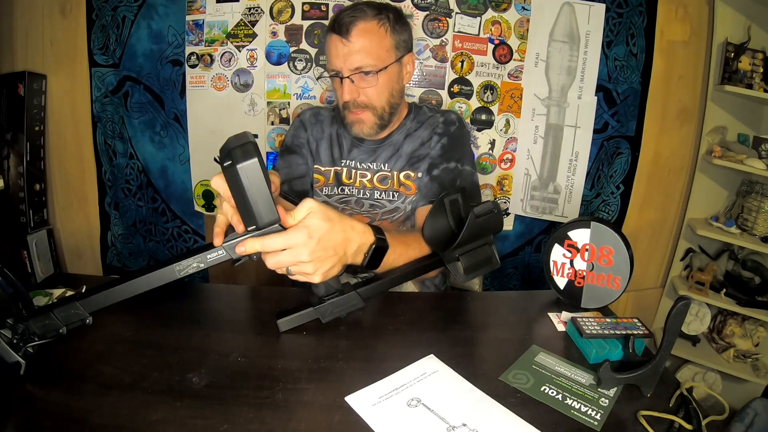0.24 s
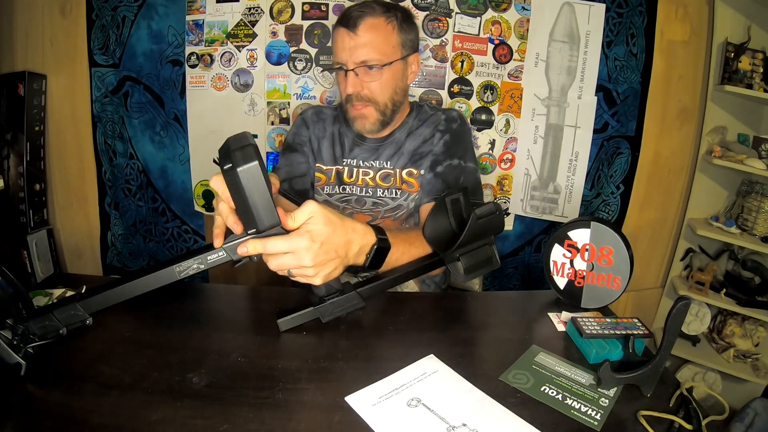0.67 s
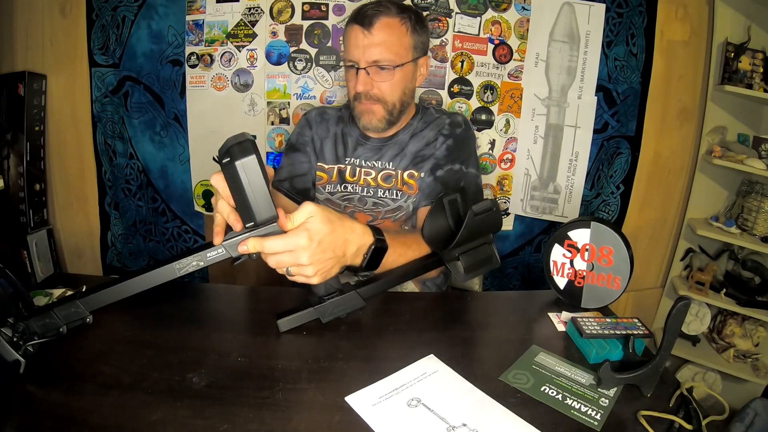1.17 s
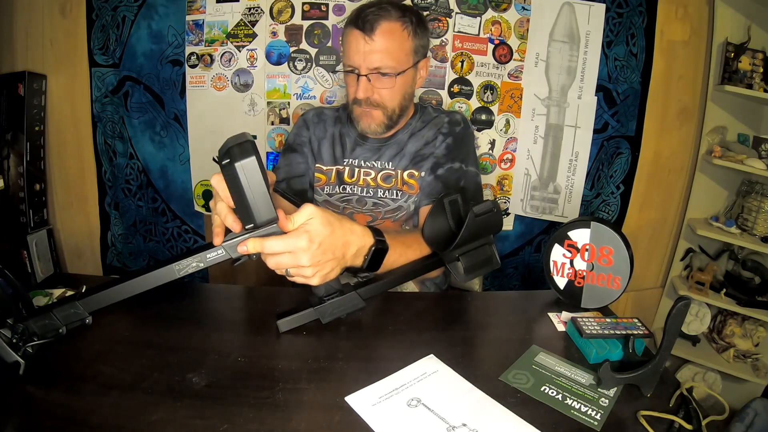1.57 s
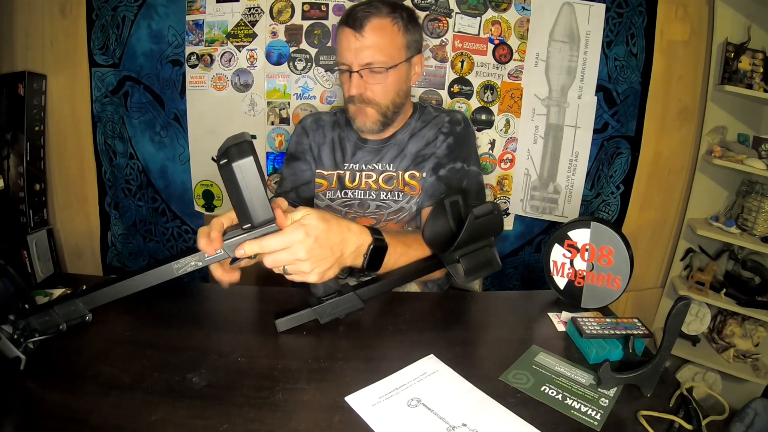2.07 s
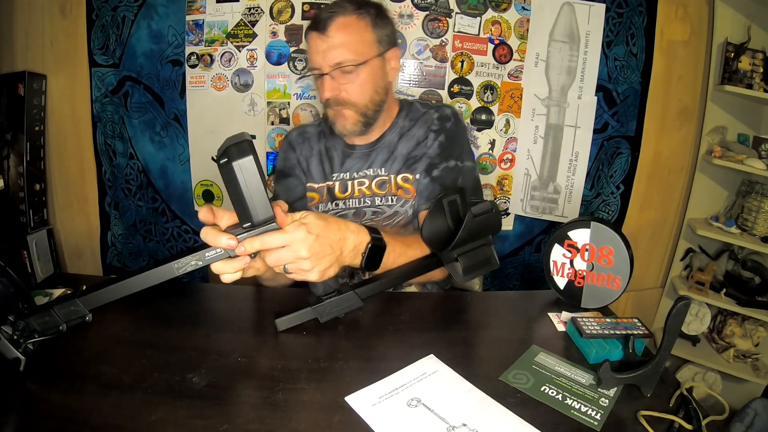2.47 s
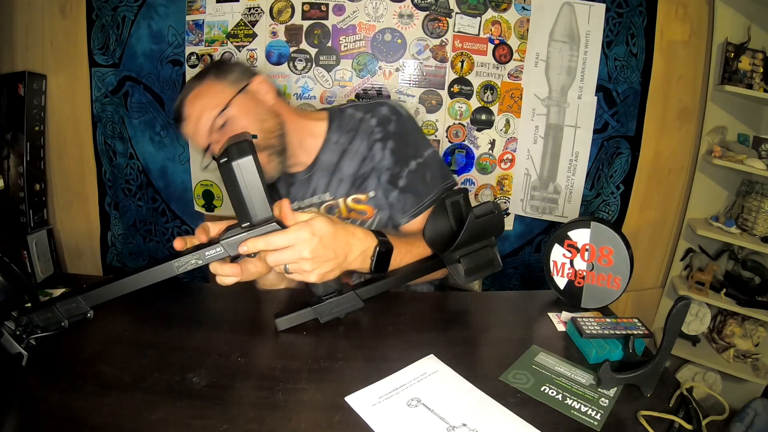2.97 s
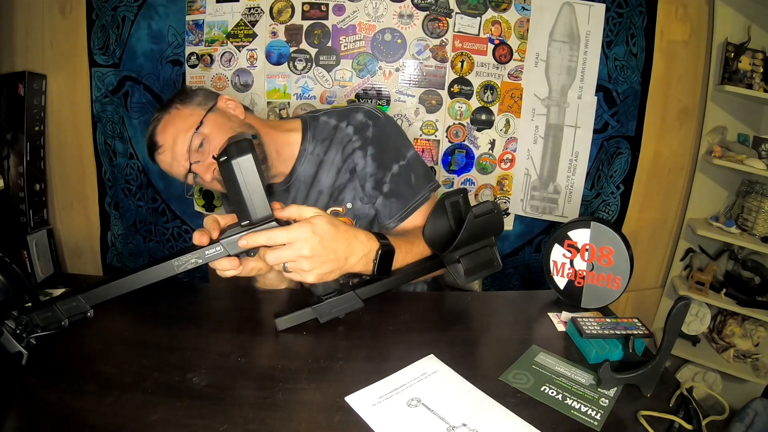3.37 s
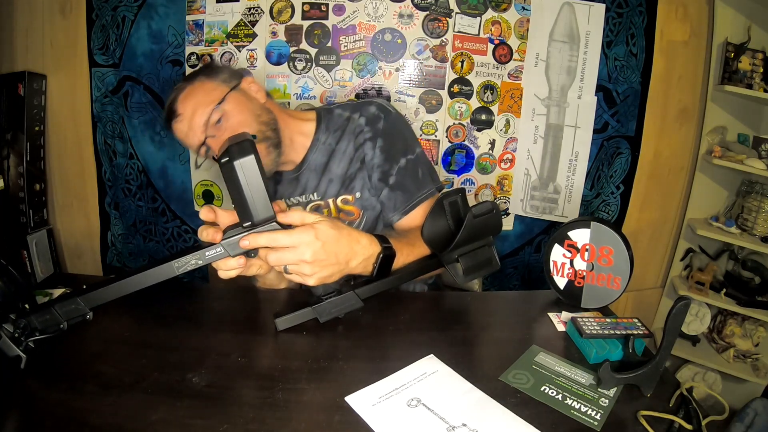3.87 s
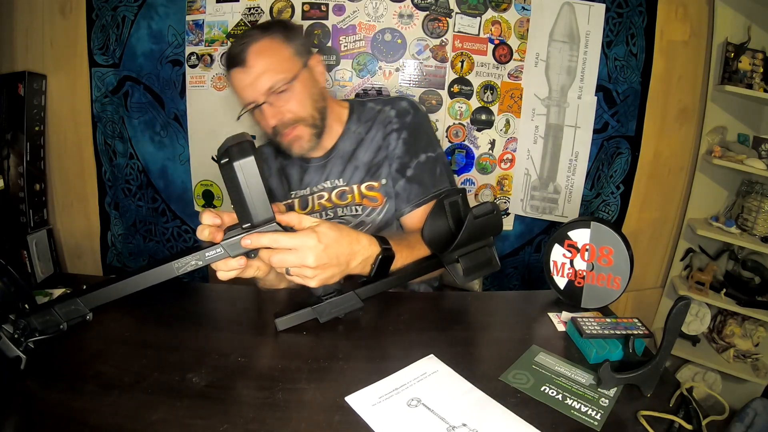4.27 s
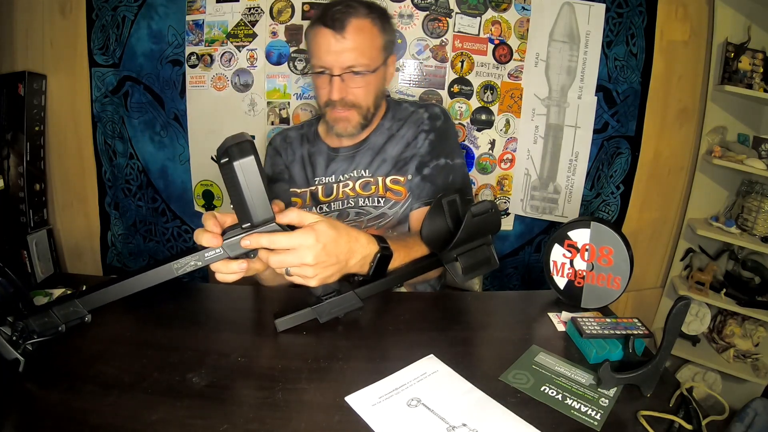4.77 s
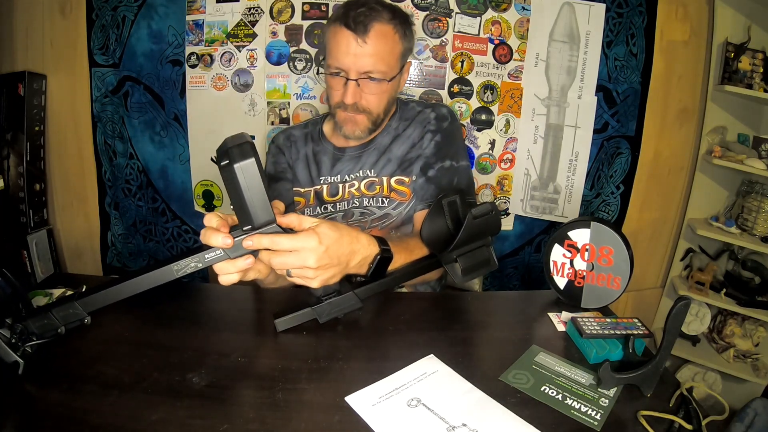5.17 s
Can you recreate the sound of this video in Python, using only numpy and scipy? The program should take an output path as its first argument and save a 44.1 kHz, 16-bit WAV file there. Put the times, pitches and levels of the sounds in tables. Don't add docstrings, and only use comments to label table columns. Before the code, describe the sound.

Hands fit a hard plastic housing onto a hollow shaft at a wooden desk. Small rattles and soft thumps lead to a sharp catch snap, then clacks, a gritty ratcheting slide, sparse dry ticks and faint scuffs. A heavy knock lands late, followed by a few light clacks. Small quiet room with brief wall reflections, stereo microphone standing on the desk, picking up low bumps through the wood.

```python
import sys
import numpy as np
from scipy import signal
from scipy.fft import rfft, irfft
from scipy.io import wavfile
from scipy.ndimage import uniform_filter1d

SR = 44100
rng = np.random.default_rng(int(sys.argv[2]) if len(sys.argv) > 2 else 0)


def volts_from_decibels(level):
    exponent = np.asarray(level, float) / 20
    return 10 ** exponent


def persist_wave(psi):
    counts = np.round(np.clip(psi, -1, 1) * 32767).astype(np.int16)
    wavfile.write(sys.argv[1], SR, np.atleast_2d(counts).T)


N = 239771

# (pitch_hz, still_air, wall_echoes, sliding_hands)
LIKENESS = [(60, 0.37, 1, .9), (249, -0.032, 0.89, .9), (397, -1.2, 0.81, 0.55), (700, -0.64, 0.23, 0.19),
            (1150, -0.71, 0.14, 0.21), (1800, -0.3, 0.51, 0.24), (2680, 0.2, 0.52, 0.94),
            (4200, 0.45, 0.57, 0.84), (5370, 0.27, 0.15, .4), (9000, 0.15, 0.02, 0.37)]


def evened(x):
    return x / np.sqrt(np.mean(x ** 2) + 1e-20)


def peaked(x):
    return x / (abs(x).max() + 1e-12)


def read(points, hz, axis=1):
    table = np.transpose(points)
    return np.interp(np.log(hz + 1), np.log(table[0] + 1), table[axis])


def add(mix, s, sound):
    part = mix[round(s * SR):][:len(sound)]
    part += sound[:len(part)]


def band(x, lo_hz, hi_hz):
    return signal.sosfilt(signal.butter(4, [lo_hz, hi_hz], "band", fs=SR, output="sos"), x)


def ring(x, modes, stretch=1):
    total = 0
    for k, (hz, width, db) in enumerate(modes):
        b, a = signal.iirpeak(hz * stretch, max(hz / width, .3), SR)
        total = total + (-1) ** k * volts_from_decibels(db) * signal.lfilter(b, a, x)
    return total


def swells(s, db, fade_s, rise_s, rest_db):
    late = np.arange(0, N + 64, 64) / SR - s[:, None]
    shape = db[:, None] - 20 * np.maximum(late / np.maximum(fade_s, .02)[:, None], -late / rise_s)
    level_db = 10 * np.log10((volts_from_decibels(shape) ** 2).sum(0) + volts_from_decibels(rest_db) ** 2)
    return np.interp(np.arange(N) / 64, np.arange(len(level_db)), level_db)


def noise(spectrum_db, patchy_db, size, close=0):
    hop, hz = size // 4, np.fft.rfftfreq(size, 1 / SR)
    frames = N // hop + 5
    starts = np.arange(frames) * hop
    a, b, c, d, patches = rng.standard_normal((frames, len(hz), 5)).T
    patches = uniform_filter1d(patches, size=6, axis=0)
    patches = evened(uniform_filter1d(patches, size=12, axis=1))
    close = np.interp(starts, np.arange(N), close * np.ones(N))
    same = np.outer(read(LIKENESS, hz), 1 - close) + np.outer(read(LIKENESS, hz, axis=3), close)
    same = np.clip(same, -1, 1)
    first = a + 1j * b
    second = same * first + np.sqrt(1 - same ** 2) * (c + 1j * d)
    z = np.array([first, second]) * volts_from_decibels(spectrum_db(hz[:, None], starts / SR) + patchy_db * patches)
    return signal.istft(z, nperseg=size, noverlap=size - hop)[1][:, :N]


def ticks():
    # (start_s, peak_db, shell_ring_hz, shaft_hollow_db)
    clacks = [(0.1667, -44.5, 1840, -7.5), (0.825, -52.5, 2250, -9), (0.9958, -56, 1860, -18),
              (1.104, -44.5, 2500, -7.5), (1.1117, -46.5, 2020, -2.5), (1.1546, -42, 2210, -3),
              (2.8587, -42.5, 2410, -8), (3.9809, -52.5, 2940, -6), (3.9957, -39, 2630, -9.5),
              (4.7069, -59, 1910, 1), (4.7328, -46.5, 2170, -13.5), (4.8466, -40, 2720, -12.5)]
    rattles = [(0.1042, -50, 2300, -3), (0.3363, -47.5, 2200, 5), (0.9013, -55, 2300, -13),
               (0.9199, -49, 2320, -9.5), (1.0847, -59.5, 3050, -16), (1.724, -44, 2570, -10.5),
               (2.37, -51, 2800, -38), (3.7491, -51.5, 2370, -4), (4.9093, -53.5, 2510, -27.5)]
    taps = [(0.0727, -66, 2030, -18), (0.3037, -57.5, 2830, -0.5), (0.3453, -49.5, 2530, 8),
            (0.4828, -59, 2440, -3), (1.6307, -66, 2160, 8.5), (1.6975, -62, 2620, 3),
            (3.684, -52.5, 2090, -2), (4.693, -53, 3070, 0.5), (5.03, -65.5, 1800, -2),
            (5.2044, -81, 1815, 24), (5.3228, -66, 2440, 10.5)]
    nicks = [(0.2421, -58.5, 2630, -3), (0.6798, -53, 2530, 1.5), (3.4458, -58.5, 3190, -3),
             (4.8302, -56.5, 2570, -3), (4.9659, -66.5, 1693, 21), (5.1027, -58.5, 2960, -11)]
    swipes = [(1.3205, -59.5, 2090, 5.5), (3.045, -50, 2960, -13), (3.5054, -61.5, 2800, -3),
              (3.581, -60.5, 3100, 1), (3.7948, -58.5, 3060, -4)]
    pips = [(2.519, -49.5, 2260, -3.5), (2.6324, -43, 2080, -8), (2.6639, -37.5, 2220, -13.5),
            (2.741, -48, 2330, -26)]
    snaps = [
        (0.5293, -27.5, 2680, -17),
        (0.5467, -19.5, 2510, -14),
    ]
    latch = [(0.7141, -27, 2440, -14.5)]
    seating = [
        (4.215, -30, 2490, -1.5),
        (4.2173, -30.5, 2320, 12.5),
    ]
    # (rows, bright_edge_db, contact_ms, top_hz, share_to_walls_db)
    kinds = [(clacks, -1, 1.54, 11300, -0.09), (rattles, -1.8, 3.64, 9000, -.1), (taps, -17, 3.45, 9100, -.1),
             (nicks, 5.8, 2.03, 8600, -.1), (swipes, 6, 10.3, 10900, -.1), (pips, -0.5, 1, 9700, 0),
             (snaps, -1.7, 1.7, 12200, -.1), (latch, -2.4, 2.65, 6000, -2.5), (seating, -7, 3, 9800, -1)]
    # (pitch_hz, width_hz, level_db)
    edge_modes = [(3960, 780, -7), (6490, 720, -12), (9450, 740, -18.5), (15000, 900, -24.5)]
    # (pitch_hz, width_hz, level_db)
    hollow_modes = [(547, 360, 0), (1004, 453, 3), (1202, 642, -3.5)]
    out, t = np.zeros((3, N)), np.arange(2000) / SR
    hits = sorted((*row, *kind) for rows, *kind in kinds for row in rows)
    grits = rng.standard_normal((len(hits), 3, len(t)))
    for (s, db, hz, hollow_db, edge_db, ms, top_hz, wall_db), grit in zip(hits, grits):
        u = 1000 * t / max(ms, .2)
        contact = (grit[0] + [[.12], [.5], [.5]] * grit) * np.sqrt(u) * np.exp(-u) * .5
        contact[:, 0] += 3.77 * np.exp(-ms / 2.85)
        contact[2] = (t == 0) * np.linalg.norm(contact[0]) * volts_from_decibels(wall_db)
        stretch = 1 + .08 * np.tanh(grit[0, -1])
        shell = ring(contact, [(hz, 420, 0), (hz * 1.424, 1100, -7), (hz * 0.69, 900, -8), (hz * 2.07, 1600, -10)])
        shell[2] -= 0.48 * ring(contact[2], [(hz, 450, 0)])
        thinned = signal.lfilter([1, -min(ms / 11, 1)], 1, contact)
        edges = ring(thinned, edge_modes, stretch)
        hollow = ring(contact, hollow_modes, stretch)
        parts = (0, shell), (edge_db, edges), (hollow_db, hollow)
        sound = sum(volts_from_decibels(db + g) * part / abs(part[0]).max() for g, part in parts)
        for row, wave in zip(out, band(sound, 180, min(top_hz, 18000))):
            add(row, s, wave)
    return signal.sosfilt(signal.butter(2, 380, "high", fs=SR, output="sos"), out)


def slips():
    # (start_s, peak_db, shell_ring_hz)
    jumps = [(0.7145, -29.5, 2680), (0.7198, -34.5, 2950), (1.1326, -45, 2020), (1.1478, -40.5, 1950),
             (1.167, -48, 3330), (1.177, -48.5, 2180), (1.79, -46.5, 2800), (1.814, -51, 2450),
             (2.0738, -57, 2050), (2.0835, -50.5, 1940), (2.128, -47, 2000), (2.145, -46, 2020),
             (2.157, -44, 2130), (2.1665, -44, 2300), (2.176, -43, 1940), (2.1874, -43, 2100),
             (2.2024, -41, 2050), (2.227, -39.5, 2080), (2.2582, -38.5, 2050), (2.2755, -51, 4400),
             (2.2851, -41.5, 1980), (2.3155, -61, 4400), (2.342, -50, 1910), (2.4121, -49.5, 2160),
             (2.5193, -46, 2120), (2.5653, -44, 2110), (2.633, -43.5, 2085), (2.665, -39, 2180),
             (2.741, -56, 2190), (2.8087, -53, 2090), (2.817, -51, 2330), (2.831, -47.5, 3000),
             (2.929, -47.5, 2530), (2.9851, -49, 2420), (3.0044, -57, 2290), (4.9663, -54, 827),
             (4.965, -61, 4900)]
    out, spike = np.zeros((2, N)), np.eye(1, 600)[0]
    for s, db, hz in jumps:
        ping = ring(spike, [(hz, 240, 0), (hz * 1.213, 400, -4), (hz * 1.62, 700, -12), (6500, 900, -16)])
        ping = volts_from_decibels(db) * peaked(ring(ping, [(hz * 1.0, 3000, 0)]))
        spread = ring(spike, [(hz * 0.73, 1900, 7.0), (5200, 2500, -3.0)])
        add(out[0], s, ping)
        add(out[1], s, np.linalg.norm(ping) * spread)
    return out


def knock():
    # (peak_s, level_db)
    blows = [(4.2066, -35), (4.213, -32), (4.2148, -43), (4.218, -16), (4.2205, -16), (4.2236, -6),
             (4.2279, -10), (4.231, -22.5), (4.2368, -15.5), (4.247, -13.5)]
    # (pitch_hz, level_db, t60_s)
    desk_rings = [(57.6, -16.5, 0.28), (98.8, -11, 0.26), (167, -3, 0.14), (192, 2, 0.21),
                  (263, -6.5, 0.21), (285, -15.5, 0.11), (314, -16, .1), (336, -13, 0.24), (369, -14, 0.19),
                  (394, -10.5, 0.27), (438.5, -12, 0.22), (482, -22, 0.082)]
    # (pitch_hz, level_db, t60_s)
    shaft_rings = [(537, -17.5, 0.13), (584, -18, 0.28), (660, -15.5, 0.2), (692, -11, 0.12),
                   (740, -11, 0.088), (823, -13.5, 0.2), (874, -12, 0.2), (990, -19.5, 0.11),
                   (1086, -18.5, 0.11), (1206, -28.5, 0.14)]
    desk_struck_s, shaft_struck_s = 4.2245, 4.2175
    legs_hz = 180
    t, push, body = np.arange(SR // 2) / SR, np.zeros(N), np.zeros(N)
    u = t[:441] - .005
    blow = np.exp(-(u / 0.00052) ** 2) - 0.06 * np.exp(-(u / 0.0046) ** 2)
    blow = -peaked(blow) * np.hanning(len(u))
    for s, db in blows:
        add(push, s - .005, volts_from_decibels(db) * blow)
    struck = (desk_struck_s, desk_rings, -17.0, 2.5, 1), (shaft_struck_s, shaft_rings, -18.0, 1.0, -1)
    for s, modes, level_db, cycles, side in struck:
        for hz, db, t60 in modes:
            swell = 1 - np.exp(-t * hz / cycles)
            fade = volts_from_decibels(level_db + db - 60 * t / max(t60, .02))
            add(body, s, side * np.sign(hz - legs_hz) * fade * swell * np.sin(2 * np.pi * hz * t))
    return band(push, 114, 9000) + body


def rasps():
    rasp_times = [.35, .555, .78, 1.17, 1.334, 1.335, 1.389, 1.39, 2.155, 2.156, 2.2, 2.245, 2.25, 2.375,
                  2.41, 3.052, 3.053, 3.055, 3.078, 3.432, 3.512, 3.514, 3.588, 3.59, 3.8, 3.802, 3.9, 4.0,
                  4.207, 4.54, 4.7, 4.71, 4.815, 4.816, 4.9, 5.33]
    # (level_db, fade_s, pitch_hz, width_hz)
    rasp_tones = [(-53, 0.045, 520, 180), (-41, 0.022, 1220, 390), (-61.5, 0.053, 390, 140),
                  (-56.5, 0.04, 1110, 210), (-58, 0.031, 1310, 270), (-67, 0.024, 4700, 1900),
                  (-69.5, .04, 3300, 7100), (-71.5, 0.083, 1300, 360), (-59, 0.032, 4900, 860),
                  (-60.5, 0.033, 6600, 610), (-66, 0.17, 2230, 900), (-60.5, 0.059, 6800, 800),
                  (-60, 0.073, 4200, 1000), (-72, 0.027, 6400, 900), (-65.5, .1, 810, 110),
                  (-62, 0.037, 1300, 390), (-66, 0.033, 2600, 740), (-73, 0.043, 940, 110),
                  (-66, 0.021, 1370, 300), (-60, 0.02, 1090, 95), (-65.5, .03, 1100, 90),
                  (-66, 0.027, 750, 140), (-63.5, 0.025, 750, 190), (-68, 0.037, 1160, 70),
                  (-63, .03, 720, 110), (-65, 0.027, 1090, 110), (-68.5, 0.039, 720, 200),
                  (-63, 0.032, 970, 200), (-57.5, .03, 1100, 1900), (-71.5, 0.035, 550, 270),
                  (-63.5, 0.08, 2200, 1700), (-60, 0.11, 576, 190), (-68, 0.033, 5000, 300),
                  (-72, .03, 2630, 340), (-68, 0.056, 2100, 700), (-59.5, 0.059, 584, 130)]
    rise_s = 0.019
    out, t = np.zeros((2, N)), np.arange(-SR // 20, SR // 4) / SR
    grits = rng.standard_normal((len(rasp_tones), 3, len(t)))
    for s, (db, fade_s, hz, width), grit in zip(rasp_times, rasp_tones, grits):
        hiss = ring(grit[0] + 1.2 * grit[1:], [(hz, width, 0)])
        hiss = ring(hiss, [(hz, width * 1.2, 0)])
        shape = volts_from_decibels(db - 20 * np.maximum(t / max(fade_s, .005), -t / rise_s))
        for row, wave in zip(out, shape * evened(hiss)):
            add(row, s + t[0], wave)
    return out


def sparks():
    # (start_s, peak_db)
    spark_hits = [(0.1037, -70), (0.1436, -68), (0.166, -60), (0.2428, -69.5), (0.3356, -67), (0.5287, -53),
                  (0.5457, -38), (0.6804, -64), (0.7138, -66), (0.9028, -72.5), (1.1114, -67.5),
                  (1.1114, -51), (1.3279, -56), (1.3279, -58), (1.7235, -69), (1.7235, -61), (2.0827, -68),
                  (2.2263, -63), (2.2478, -50), (2.3421, -63), (2.376, -42), (2.5187, -67), (2.6319, -63),
                  (2.6638, -62), (2.6638, -59), (2.7407, -68), (2.8594, -63), (3.048, -53), (3.5084, -66),
                  (3.5813, -65), (3.7489, -73), (3.7988, -74), (3.7988, -66), (3.9799, -63), (3.9943, -63),
                  (4.2158, -50.5), (4.2158, -49.5), (4.7057, -68), (4.7316, -53.5), (4.8294, -56),
                  (4.8454, -43), (4.9097, -67), (5.1023, -67), (5.1073, -69)]
    out, t = np.zeros((2, N)), np.arange(400) / SR
    for (s, db), grit in zip(spark_hits, rng.standard_normal((len(spark_hits), 3, len(t)))):
        burst = (grit[0] + .6 * grit[1:]) * np.exp(-t / .0011)
        for row, wave in zip(out, band(burst, 6200, 12500)):
            add(row, s, volts_from_decibels(db - 3.0) * wave)
    return out


def scuff():
    # (time_s, level_db)
    scuff_curve = [
        (3.36, -86),
        (3.379, -65),
        (3.42, -69),
        (3.449, -78),
        (3.47, -108),
    ]
    # (pitch_hz, width_hz, level_db, drift_share, swell_db)
    scuff_modes = [
        (1070, 130, 4, 0, 7.5),
        (3030, 800, 0.5, -0.01, -7),
        (4840, 570, -3, -.1, 3),
    ]
    s, db = np.transpose(scuff_curve)
    grit, t = rng.standard_normal(N)[:SR // 5], np.arange(SR // 5) / SR
    along, out, hiss = np.clip(t / (s[-1] - s[0]), 0, 1), np.zeros(N), 0
    grit = grit * volts_from_decibels(3.0 * evened(uniform_filter1d(grit[::-1], size=120)))
    for hz, width, gain_db, drift, swell_db in scuff_modes:
        turn = np.exp(2j * np.pi * np.cumsum(hz * (1 + drift * along)) / SR)
        r = np.exp(-np.pi * width / SR)
        slow = signal.lfilter([(1 - r) ** 2], [1, -2 * r, r * r], grit / turn)
        hiss = hiss + volts_from_decibels(gain_db + swell_db * along) * (turn * slow).real
    add(out, s[0], volts_from_decibels(np.interp(t + s[0], s, db)) * evened(hiss))
    return out


def hands(axis):
    # (peak_s, rubbing_db, desk_weight_db, fade_s)
    strokes = [(0, -70.5, -53, 0.18), (.51, -74.5, -55, 0.1), (.76, -94, -61.5, 0.45),
               (1.133, -69, -56, 0.19), (1.41, -80, -84, 0.066), (1.725, -64, -56.5, 0.21),
               (1.835, -64.5, -90, 0.33), (2.162, -56.5, -44.5, 0.27), (2.35, -71, -53.5, 0.092),
               (2.7, -69.5, -52.5, 0.042), (2.848, -63.5, -61.5, 0.59), (3.1, -72, -94, 0.78),
               (3.68, -78, -64.5, 0.4), (3.85, -77.5, -65, 0.98), (4.3, -72, -80, 0.13),
               (4.698, -70, -60, 0.38), (4.87, -80, -65.5, 1), (5.32, -77, -63.5, 0.11)]
    rest_rub_db, rest_hum_db = -82.5, -72
    rows = np.transpose(strokes)
    return swells(rows[0], rows[axis], rows[3], rise_s=0.1, rest_db=[rest_rub_db, rest_hum_db][axis - 1])


def rub():
    # (pitch_hz, density_db_per_hz)
    rub_colour = [(290, -46.5), (500, -22), (637, 8.5), (922, -1.5), (990, 1), (1700, 0.5), (2530, -3.5),
                  (3940, -6.5), (6480, -5.5), (7580, -16), (9380, -12), (11600, -26), (14000, -26),
                  (15000, -31)]
    faint_db, clear_db = -76.5, -65.5
    level_db = hands(axis=1)
    bright_db = 2.5 + 0.223 * (level_db - hands(axis=2))

    def colour(hz, t):
        tilt_db = np.interp(t, np.arange(N) / SR, bright_db)
        return read(rub_colour, hz) + tilt_db * np.log2((hz + 50) / 2500)

    close = np.clip((level_db - faint_db) / (clear_db - faint_db), 0, 1)
    plain = noise(colour, patchy_db=3.0, size=512, close=close)
    lumps = uniform_filter1d(rng.exponential(1, N) ** 2, size=90)
    grit = volts_from_decibels(1.2 * evened(lumps - 2))
    unit = np.sqrt(np.median(uniform_filter1d(plain[0] ** 2, size=4000)))
    return volts_from_decibels(level_db + 3.5) * plain / unit * evened(grit)


def desk():
    # (start_s, peak_db, main_pitch_hz, t60_s)
    jolts = [(0.168, -42.5, 192, 0.11), (0.335, -31.5, 198, 0.18), (0.543, -39.5, 286, 0.11),
             (0.677, -42.5, 295, 0.09), (0.712, -31.5, 167, 0.028), (0.833, -51, 159, 0.051),
             (1.149, -39.5, 182.4, 0.12), (1.192, -41, 180, 0.088), (1.324, -56, 200, 0.16),
             (1.814, -50.5, 171.5, 0.16), (2.074, -47.5, 251.7, 0.14), (2.104, -60, 180, 0.03),
             (2.26, -47.5, 151, 0.23), (2.286, -34, 169, 0.072), (2.33, -51, 163, 0.048),
             (2.535, -45, 161, 0.1), (2.568, -43, 175, 0.097), (2.634, -45.5, 162.7, 0.22),
             (2.673, -43.5, 166.5, 0.16), (2.82, -43.5, 209, 0.11), (2.938, -48.5, 165, 0.13),
             (3.188, -53, 159, 0.093), (3.441, -53, 165, 0.13), (3.517, -50, 154.5, 0.19),
             (3.581, -45, 174.6, 0.15), (3.756, -43, 189.6, 0.25), (3.991, -54, 158, 0.45),
             (4.7, -56, 206.5, 0.19), (5.201, -49.5, 240, 0.12)]
    bumps = [(0.105, -40.5, 174.7, 0.14), (0.25, -58, 162, 0.21), (1.105, -55, 160, 0.55),
             (1.72, -40, 193, 0.11), (1.755, -40.5, 185, 0.11), (2.006, -49, 162, 0.062),
             (2.14, -46.5, 186, 0.59), (2.209, -34, 181, 0.061), (2.848, -44, 178.7, 0.22),
             (3.047, -67, 149, 0.15), (3.69, -46, 285, 0.062), (3.798, -42, 256.4, 0.18),
             (4.741, -58, 176, 0.15), (5.281, -45.5, 190, 0.075), (5.329, -59, 193, 0.19)]
    shoves = [(0.36, -32.5, 167, 0.14), (0.409, -33, 171, 0.098), (0.478, -43, 161, 0.1),
              (2.166, -35, 163, 0.066), (2.41, -49.5, 176, 0.079), (4.222, -34.5, 195, 0.18),
              (4.91, -76, 187, 0.073)]
    pushes = [(jolts, -38), (bumps, -22), (shoves, -9.5)]
    # (pitch_hz, width_hz, level_db)
    desk_modes = [(167.35, 23.4, 0.5), (217.4, 18, -6), (267.8, 36, -4), (340, 85, -8), (417, 119, -8.5)]
    # (peak_s, level_db, fade_s)
    sways = [(.15, -62.5, 0.99), (.6, -51.5, 0.031), (.82, -79, .07), (1.12, -64.5, 0.93),
             (1.89, -68.5, 0.88), (2.53, -71, 0.52), (3.182, -56, 0.053), (3.8, -62, 0.49),
             (4.3, -50.5, 0.048), (4.56, -75, 0.48), (4.98, -56, 0.52), (5.43, -53.5, 0.11)]
    out, t = np.zeros(N), np.arange(SR // 3) / SR
    thuds = sorted((*row, deep_db) for rows, deep_db in pushes for row in rows)
    for (s, db, hz, t60, deep_db), turn in zip(thuds, rng.random((len(thuds), len(desk_modes) + 1))):
        boom = 0
        for (f, width, g), u in zip([(hz, 0, 4)] + desk_modes, turn):
            boom = boom + volts_from_decibels(g - 14.0 * u - 1.13 * width * t) * np.sin(2 * np.pi * f * t)
        boom = peaked(boom) + volts_from_decibels(deep_db) * np.sin(2 * np.pi * (65 + 30 * turn[0]) * t)
        shape = (1 - np.exp(-t / 0.021)) * volts_from_decibels(-60 * t / max(t60, .02))
        add(out, s, volts_from_decibels(db + 13.0) * boom * shape)
    hum = band(ring(rng.standard_normal(N), desk_modes), 138.0, 419)
    out += volts_from_decibels(hands(axis=2)) * evened(hum)
    sway_db = swells(*np.transpose(sways), rise_s=0.16, rest_db=-77.5)
    sway = evened(band(rng.standard_normal(N), 20, 44.0))
    sway = volts_from_decibels(sway_db) * (sway + volts_from_decibels(-15.5) * np.array([[1], [-1]]) * sway[::-1])
    rocking = volts_from_decibels(-14.0) * band(np.roll(out, 700), 200, 940) + volts_from_decibels(-18.5) * band(out, 40, 105)
    return np.array([out + rocking, out - rocking]) + sway


def ports(x, share):
    # (pitch_hz, left_lead_radians, left_excess_db)
    port_offsets = [(100, 0.01, 1), (380, 0.01, 0.7), (600, 0.56, 3), (1410, -0.94, 2), (2800, 0.47, 0.5),
                    (5570, .8, 0.5), (11000, 2, -1.3)]
    hz = np.fft.rfftfreq(N, 1 / SR)
    half = volts_from_decibels(share * read(port_offsets, hz, axis=2) / 2) * np.exp(.5j * read(port_offsets, hz, axis=1))
    return irfft(rfft(x) * np.array([half, 1 / half]), N)


def room(x):
    # (pitch_hz, t60_s)
    room_decay = [(150, 0.45), (400, 0.23), (1000, 0.3), (2800, 0.31), (7000, 0.22), (12000, 0.23)]
    out, size = np.zeros((2, N)), SR // 3
    for shift in (0, np.pi / 2):
        echoes = np.zeros((2, size))
        at = np.arange(200, size - 10, 10) + rng.integers(0, 10, (2, (size - 201) // 10))
        np.put_along_axis(echoes, at, rng.choice([-1., 1.], at.shape), axis=1)
        hz, t, z = signal.stft(echoes, SR, nperseg=256)
        same = np.clip(read(LIKENESS, hz, axis=2), -1, 1)[:, None]
        z[1] = same * z[0] + np.sqrt(1 - same ** 2) * z[1]
        decay = volts_from_decibels(-60 * t / read(room_decay, hz)[:, None])
        decay = decay + 1.5 * np.exp(-t / 0.0045)
        tail = signal.istft(z * decay, SR, nperseg=256)[1]
        turn = np.cos(2 * np.pi * np.arange(N) / SR * 7 + shift)
        out += signal.oaconvolve((x * turn)[None], tail / np.linalg.norm(tail[0]), axes=1)[:, :N]
    return out


def still_air():
    # (pitch_hz, density_db_per_hz)
    air_colour = [(69, -23.5), (118, -20.5), (145, -3), (177, -0.5), (288, -8.5), (353, -7.5), (540, -13),
                  (860, -6), (1170, -20), (3150, -37), (3630, -40.5), (6400, -40), (9600, -40.5),
                  (11300, -57), (15000, -49.5)]
    return volts_from_decibels(-67) * evened(noise(lambda hz, t: read(air_colour, hz) + 0 * t, patchy_db=-0.5, size=2048))


def scene():
    *near, around = ticks() + scuff()
    blunt, (pings, spread) = knock(), slips()
    to_walls = volts_from_decibels(-0.5) * around + volts_from_decibels(-8.5) * band(spread, 700, 7500) + volts_from_decibels(-9.0) * band(blunt, 430, 9000)
    hits = np.array(near) + pings + blunt + rasps() + sparks()
    return ports(hits, share=1.1) + ports(rub(), share=0.21) + room(to_walls) + desk() + still_air()


def top_cut(x):
    return signal.sosfilt(signal.butter(12, 15290, fs=SR, output="sos"), x)


def record(dry):
    hz = np.fft.rfftfreq(N, 1 / SR) + 1
    treble = volts_from_decibels(-4 / (1 + (11200 / hz) ** 16))
    treble /= 1 + (hz / 15150) ** 60
    return top_cut(irfft(rfft(dry) * treble, N))


dry = scene()
out = record(dry)
persist_wave(out)
```